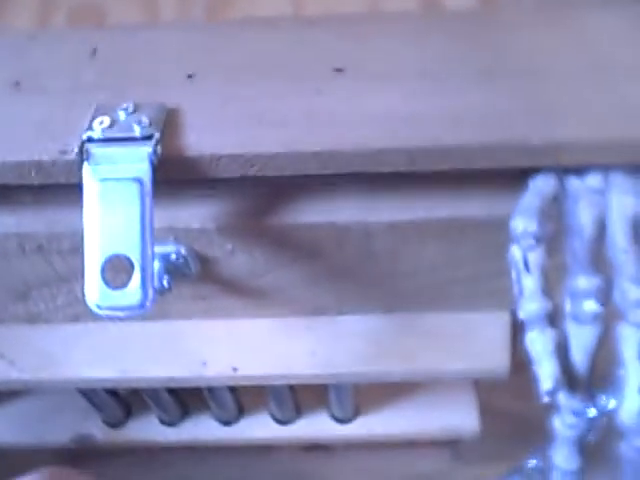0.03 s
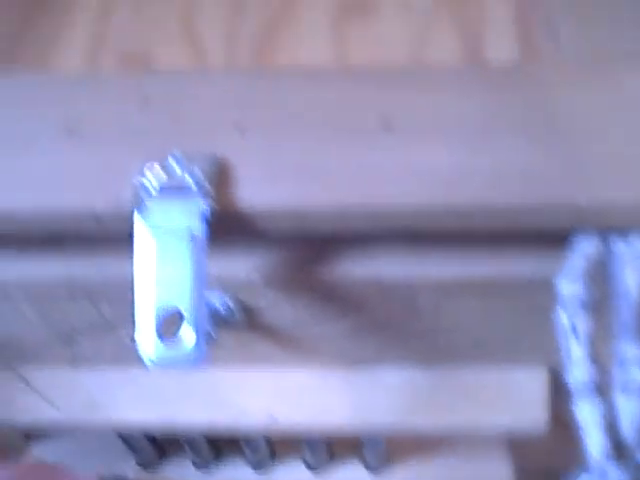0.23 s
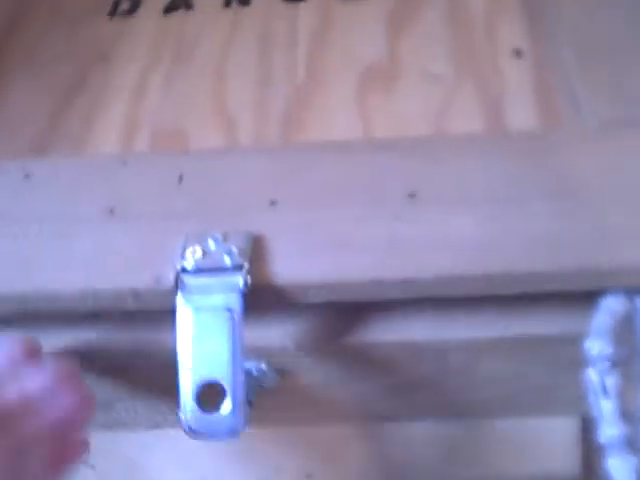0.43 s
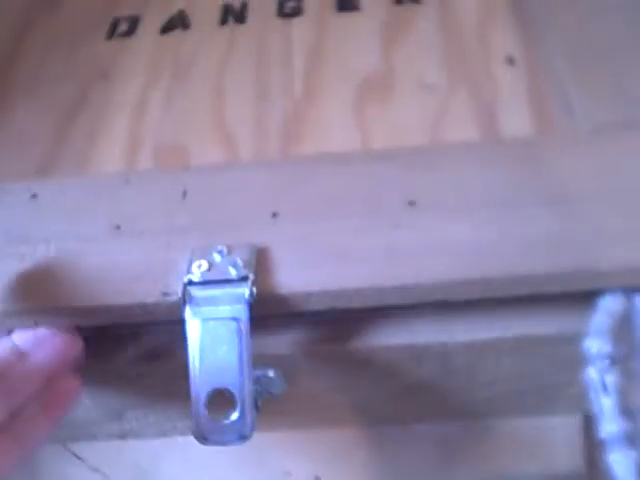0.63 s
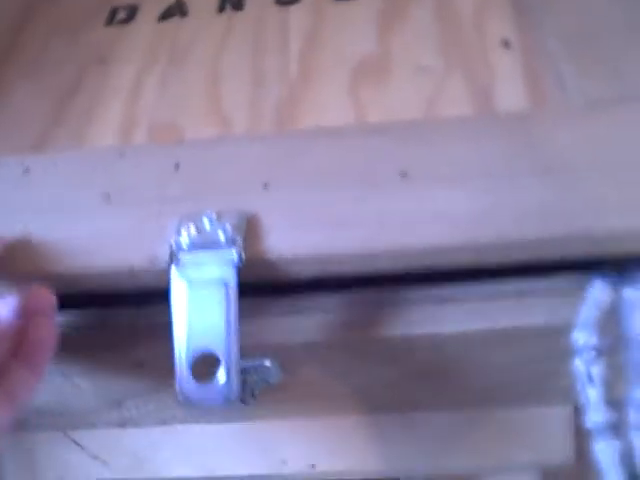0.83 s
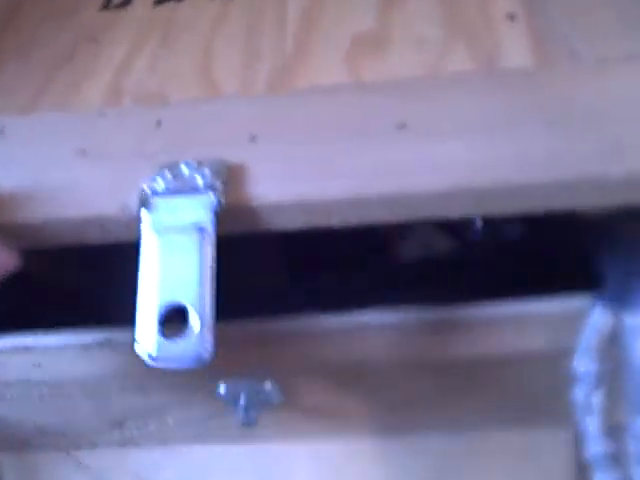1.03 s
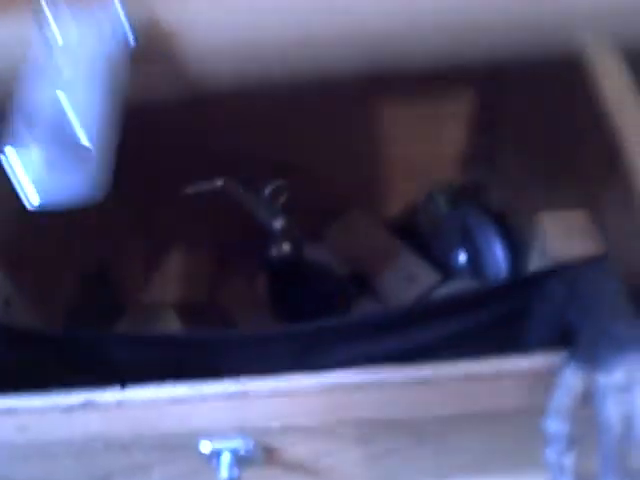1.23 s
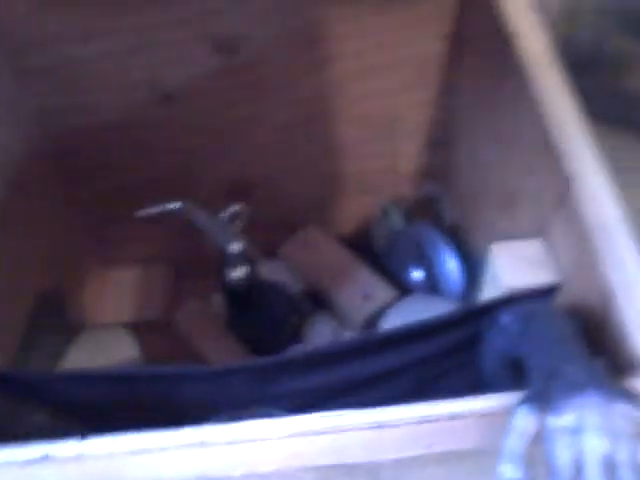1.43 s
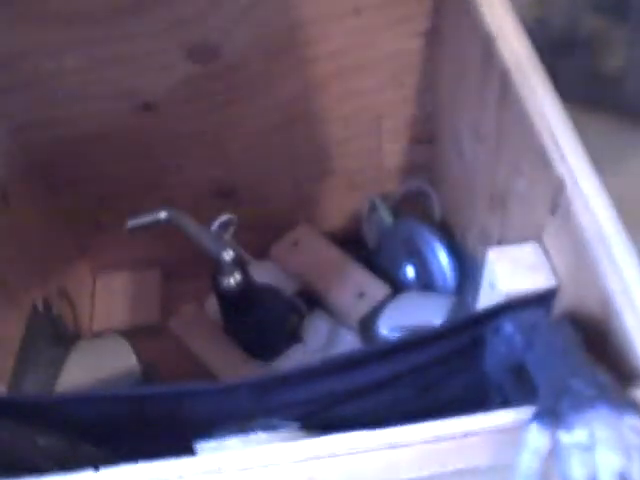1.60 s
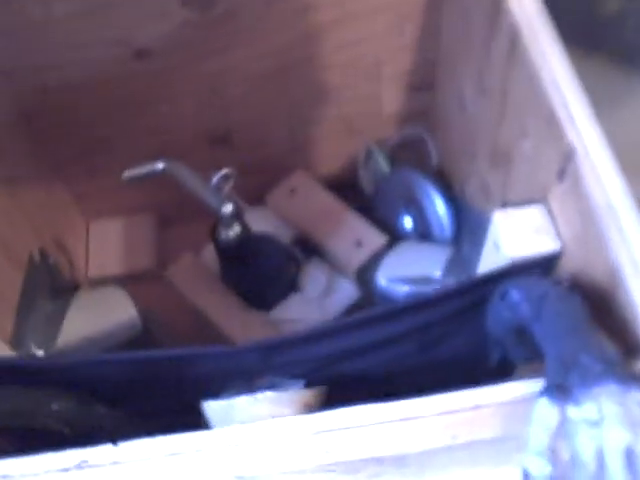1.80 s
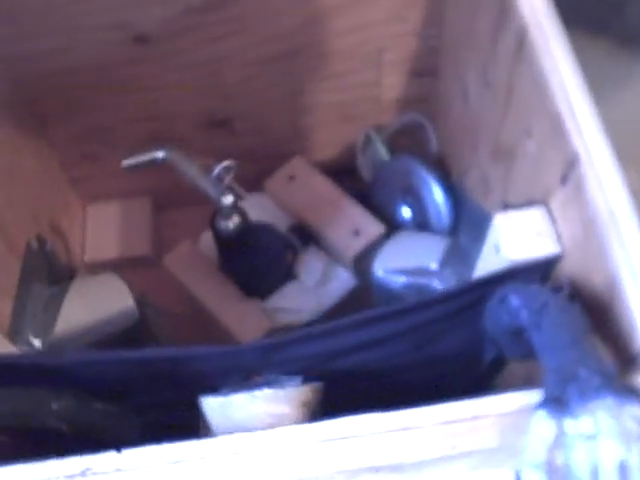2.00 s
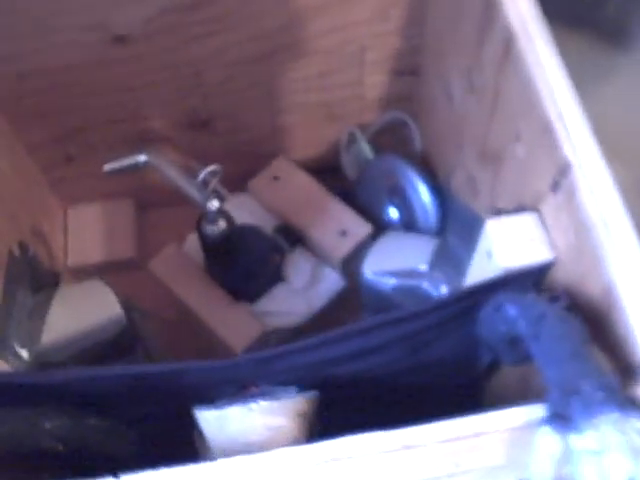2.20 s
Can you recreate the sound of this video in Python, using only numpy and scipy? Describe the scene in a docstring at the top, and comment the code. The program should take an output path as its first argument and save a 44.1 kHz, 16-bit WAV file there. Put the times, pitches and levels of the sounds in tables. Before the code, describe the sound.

Loud, close clack of a wooden lid forced open, followed by light knocks and faint rubbing.

```python
"""A plywood crate lid is forced up close to a small microphone: it scrapes, thumps, bangs and rattles.
Each blow rings the boards and the crate's modes; the bang clips the microphone and dies away in the room.
The steel hasp squeaks under load and clinks when struck.
Soft rubs and a dry tick follow, over low rumble, a deep drone and a faint hum."""
import sys
import numpy as np
from scipy import signal
from scipy.fft import rfft, irfft, next_fast_len
from scipy.io import wavfile
from scipy.ndimage import map_coordinates

SR = 44100
rng = np.random.default_rng(int(sys.argv[2]) if len(sys.argv) > 2 else 0)


def wav_record(signal):
    """Record a signal, one row per channel, as 16-bit PCM in the file named by sys.argv[1]."""
    frames = np.transpose(np.atleast_2d(signal))
    bounded = np.clip(frames, -1, 1)
    # unit amplitude maps onto the largest positive 16-bit level
    quanta = np.round(bounded * 32767).astype(np.int16)
    wavfile.write(sys.argv[1], SR, quanta)


N = 103635
T = np.arange(N) / SR

# dense ring of the boards (frequency [Hz], relative density [dB])
BOARD_SPECTRUM = [(60, -6), (150, -1.5), (400, -7.5), (500, 2), (700, 3), (1250, 1.5), (1900, -8.5),
                  (3000, -18), (4000, -11), (5200, -26), (8500, -28)]


def amp(db):
    """Decibels to gain."""
    return 10 ** (np.asarray(db) / 20)


def unit(x):
    """Scale to rms 1."""
    return x / np.sqrt(np.mean(x ** 2) + 1e-20)


def along(points, hz):
    """Interpolate (frequency [Hz], value) points on a log axis."""
    knots_hz, values = np.transpose(points)
    return np.interp(np.log(hz + 1), np.log(knots_hz + 1), values)


def filtered(x, response):
    """Zero-phase filter with gain response(hz)."""
    size = next_fast_len(N + SR // 2)
    return irfft(rfft(x, size) * response(np.fft.rfftfreq(size, 1 / SR)), size)[:N]


def noise(spectrum):
    """Coloured noise, rms 1."""
    return unit(filtered(rng.standard_normal(N), lambda hz: amp(along(spectrum, hz))))


def wobble(knots_per_s):
    """Smooth random curve."""
    return map_coordinates(rng.standard_normal(int(N * knots_per_s / SR) + 4), [T * knots_per_s])


def fade(t, t60_s):
    """Free decay from t = 0."""
    return np.exp(-np.log(1000) * np.maximum(t, 0) / t60_s)


def swell(start_s, rise_s, hold_s, t60_s):
    """Linear rise; decay begins hold_s after the start."""
    return np.clip((T - start_s) / rise_s, 0, 1) * fade(T - start_s - hold_s, t60_s)


def delayed(x, start_s):
    """Place x on the timeline."""
    return np.pad(x, (round(start_s * SR), N))[:N]


def ring(modes, scatter_db):
    """1 s of struck modes, levels scattered per strike."""
    t = T[:SR]
    return sum(amp(db + scatter_db * rng.standard_normal()) * fade(t, t60_s) * np.sin(2 * np.pi * hz * t)
               for hz, db, t60_s in modes)


def friction(spectrum, slips_per_s, hiss_gain):
    """Tiny random slips over smooth hiss, rms 1."""
    slips = (rng.random(N) < slips_per_s / SR) * rng.standard_normal(N)
    force = unit(slips) + hiss_gain * rng.standard_normal(N)
    return unit(filtered(force, lambda hz: amp(along(spectrum, hz))))


def in_room(x, tail_db=-16, rise_s=.012):
    """Add a diffuse tail with frequency-dependent decay."""
    # reverberation (frequency [Hz], t60 [s])
    decay_times = [(100, 1), (500, 0.79), (1200, 0.48), (3000, 0.57), (8000, 0.6)]
    hz, t, bands = signal.stft(rng.standard_normal(SR), SR, nperseg=256)
    bands = bands * fade(t, along(decay_times, hz)[:, None])
    tail = signal.istft(bands, SR, nperseg=256)[1][:SR] * (1 - np.exp(-T[:SR] / rise_s))
    return x + amp(tail_db) * signal.fftconvolve(x, tail / np.linalg.norm(tail))[:N]


def room_tone(rumble_db=-35, drone_hz=32.6, whine_hz=7700, whine_db=-74.5):
    """Low rumble, wavering hum, deep swelling drone and faint whine."""
    # rumble (frequency [Hz], relative density [dB])
    rumble_spectrum = [(20, -8), (33, -3), (50, -8.5), (90, -7), (130, -12), (170, -20), (220, -18.5),
                       (280, -24.5), (370, -24), (450, -33), (530, -19), (660, -31), (1000, -31),
                       (1100, -40.5), (1300, -38.5), (1700, -49.5), (2600, -51.5), (3200, -54),
                       (3900, -49.5), (4600, -58.5), (5500, -60), (8400, -61)]
    # hum tones (frequency [Hz], level [dB])
    hum_tones = [(205, -50.5), (301.5, -59.5), (513, -51), (802, -69.5), (987, -60.5)]
    # drone envelope (time [s], relative level [dB])
    drone_levels = [(0.0, -21.5), (0.12, -69), (0.24, -40), (0.28, -58), (0.44, -28.5), (0.93, -47),
                    (1.12, -26), (1.41, -49), (1.45, -35.5), (1.9, -43), (1.97, -33.5), (2.35, -37)]
    hum = sum(amp(db + 2.01 * wobble(6.14)) * np.sin(2 * np.pi * hz * T + .9 * wobble(8.1))
              for hz, db in hum_tones)
    drone_db = np.interp(T, *np.transpose(drone_levels)) + .5
    drone = amp(drone_db) * np.sin(2 * np.pi * drone_hz * T + .66 * wobble(6.7))
    whine = amp(whine_db) * np.sin(2 * np.pi * whine_hz * T)
    return amp(rumble_db) * noise(rumble_spectrum) + hum + drone + whine


def soft_rubs():
    """Brief swells of light friction."""
    # rubs (start [s], rise [s], hold [s], t60 [s], level [dB])
    rubs = [(0.567, .04, 0.23, 0.7, -44), (0.812, 0.021, 0.09, 0.33, -47), (1.688, .02, .14, .3, -55),
            (2.198, 0.007, .015, .08, -37), (2.22, 0.015, .13, .4, -47)]
    # rub friction (frequency [Hz], relative density [dB])
    spectrum = [(400, -3.5), (600, 5), (780, 3), (1100, -16), (1300, -6.5), (1470, -10.5), (1800, -12),
                (2400, -15), (3100, -26), (3950, -17.5), (4700, -33), (8000, -32.5)]
    envelope = sum(amp(db) * swell(*timing) for *timing, db in rubs)
    return envelope * friction(spectrum, slips_per_s=1000, hiss_gain=1.3)


def dry_tick(start_s=1.6312, gain_db=-15, rise_s=.0011):
    """Close tick: fast-damped modes plus a woody crack."""
    # tick modes (frequency [Hz], relative level [dB], t60 [s])
    modes = [(796, 1, .028), (884, -13, 0.051), (1422, 2.5, 0.017), (1560, -7, 0.023), (1940, -8, 0.025),
             (2210, -7.5, 0.025), (3400, -12, .015), (4449, -23, 0.019), (6600, -23.5, 0.015)]
    body = ring(modes, scatter_db=.5)
    crack = amp(-8) * noise(BOARD_SPECTRUM)[:SR] * fade(T[:SR], t60_s=.022)
    attack = 1 - np.exp(-T[:SR] / rise_s)
    return amp(gain_db) * delayed((body + crack) * attack, start_s)


def hasp(squeak_hz=3620):
    """Steel squeaks thinly under load; struck, it snaps and rings."""
    # squeaks (start [s], hold [s], level [dB])
    squeaks = [(.066, .14, -55), (.58, .03, -60), (.72, .06, -62)]
    # strikes (time [s], gain [dB])
    strikes = [(0.3168, -22.5), (0.375, -41)]
    # steel modes (frequency [Hz], relative level [dB], t60 [s])
    modes = [(3450, -14, .05), (3940, -10, .05), (4185, -7, .11), (4370, -8, .05), (4700, -12, .04)]
    # contact snap (frequency [Hz], relative density [dB])
    snap_spectrum = [(1500, -25), (3000, -10), (4300, 0), (4800, -7), (5400, -24), (8500, -30)]
    load = sum(amp(db) * swell(start_s, rise_s=.006, hold_s=hold_s, t60_s=.22)
               for start_s, hold_s, db in squeaks)
    squeak = load * np.sin(2 * np.pi * squeak_hz * T + .71 * wobble(220))
    snap = amp(15) * noise(snap_spectrum)[:SR] * fade(T[:SR], t60_s=.016)
    clinks = sum(amp(db) * delayed(ring(modes, scatter_db=0) + snap, start_s) for start_s, db in strikes)
    return in_room(clinks + squeak)


def lid_scrape():
    """The lid drags on the rim, wood on wood."""
    # scrape envelope (time [s], level [dB])
    levels = [(.135, -63), (.175, -44), (.209, -34), (.215, -21), (.228, -16), (.237, -26.5), (.26, -25),
              (.33, -28), (.42, -44.5), (.56, -47.5), (.62, -78)]
    # wood friction (frequency [Hz], relative density [dB])
    spectrum = [(180, -41.5), (300, -17), (612, -7), (755, 0.5), (1120, -5.5), (1590, -8), (1750, -21.5),
                (2130, -11.5), (5140, -24), (8500, -25), (11000, -67), (18700, -120)]
    envelope = amp(np.interp(T, *np.transpose(levels), right=-120))
    return in_room(envelope * friction(spectrum, slips_per_s=2500, hiss_gain=.6))


def lid_thump(start_s=.2135, flex_hz=93, flex_db=-12.5, boom_db=-23.5):
    """The lid flexes as it breaks free; a hollow boom lingers in the box."""
    # box boom (frequency [Hz], relative density [dB])
    boom_spectrum = [(40, -19.5), (70, -7.5), (100, -1.5), (150, -7.5), (230, -9.5), (350, -9.5),
                     (480, -14), (1000, -61.5)]
    flex = np.sin(2 * np.pi * flex_hz * (T - start_s))
    thump = amp(flex_db) * swell(start_s, rise_s=.027, hold_s=.039, t60_s=.16) * flex
    boom = amp(boom_db) * swell(start_s, rise_s=.042, hold_s=.21, t60_s=.36) * noise(boom_spectrum)
    return thump + boom


def lid_blows(modes_db=-18.5, contact_s=.00034):
    """Blows ring the boards and crate modes, each with its own loudness, brightness and bass cut."""
    # lid on crate (time [s], gain at 1 kHz [dB], tilt above 400 Hz [dB/octave], high-pass [Hz])
    blows = [(.2235, -22, 6.5, 440), (0.2456, -12, 1.5, 686), (0.2737, 3.5, -1, 348.3),
             (.2865, 3, -1, 443.3), (.2955, 2.5, -1, 550), (0.3097, -5, -5.5, 300), (0.328, -20, 4, 300),
             (0.3432, -9, -14, 500), (0.3526, -7, -5.5, 548.4), (.3595, -5, -5, 850),
             (.378, -16, -1.5, 300), (.403, -23.5, 0, 250), (0.4374, -11.5, -2.5, 1040),
             (0.4421, -14, -4.5, 1030), (.492, -23.5, -10.5, 550), (.628, -28, -7, 496),
             (.645, -36, -2.5, 400), (.746, -36, -14, 450), (0.818, -35.5, -4.5, 600), (.851, -22, -6, 766),
             (1.031, -41, -8.5, 600), (1.757, -46, 1, 800)]
    # crate modes (frequency [Hz], relative level [dB], t60 [s])
    modes = [(240, -10, 0.7), (319, -6.5, .25), (557, -9, .2), (636, -10.5, 0.23), (764, -1.5, 0.27),
             (867, -4.5, 0.2), (981, -8, 0.18), (988, -12.5, 0.34), (1194.5, 0.5, 0.23),
             (1310, -13.5, 0.23), (1504, -23.5, 0.26), (1752, -13, 0.31), (2027, -18.5, 0.14),
             (2526, -16.5, .25), (2833, -28, 0.073)]
    attack = 1 - np.exp(-T[:SR] / contact_s)
    decay = fade(T[:SR], t60_s=.052)
    out = np.zeros(N)
    for start_s, db, tilt, highpass_hz in blows:
        boards = unit(noise(BOARD_SPECTRUM)[:SR] * decay) * np.sqrt(np.mean(decay ** 2))
        crate = amp(modes_db) * ring(modes, scatter_db=5.5)
        blow = delayed((boards + crate) * attack, start_s)
        blow = signal.sosfilt(signal.butter(2, highpass_hz, "high", fs=SR, output="sos"), blow)
        blow = filtered(blow, lambda hz: amp(tilt * np.log2(np.maximum(hz, 400) / 1000)))
        out += in_room(amp(db) * blow)
    return out


def scene():
    """Mono sum at the microphone."""
    lid = lid_blows() + lid_scrape() + lid_thump()
    return (lid + hasp() + dry_tick() + soft_rubs() + room_tone())[None]


def record(dry, mic_cutoff_hz=8555, clip_level=.71, output_cutoff_hz=15800):
    """Narrow-band microphone that clips on the bang."""
    narrow = filtered(dry[0], lambda hz: np.clip((mic_cutoff_hz - hz) / 200 + .5, 0, 1))
    clipped = narrow / (1 + np.abs(narrow / clip_level) ** 16) ** (1 / 16)
    return filtered(clipped, lambda hz: hz < output_cutoff_hz)[None]


dry = scene()
out = record(dry)
wav_record(out)
```